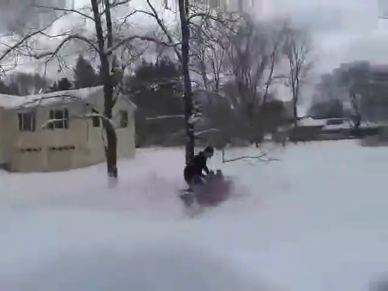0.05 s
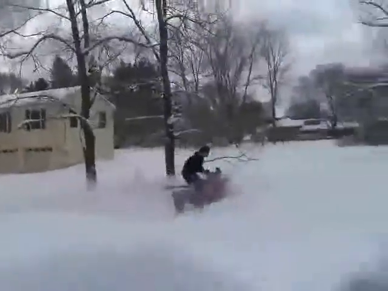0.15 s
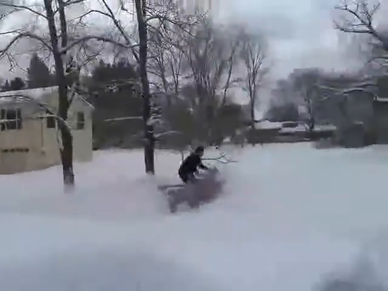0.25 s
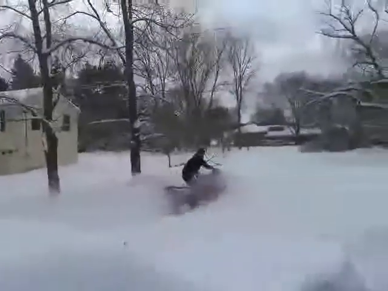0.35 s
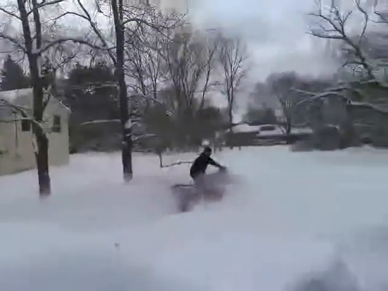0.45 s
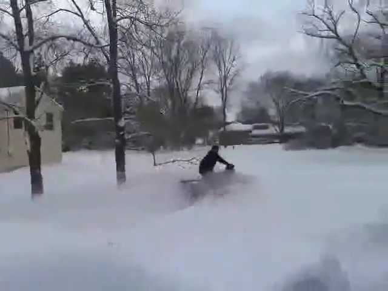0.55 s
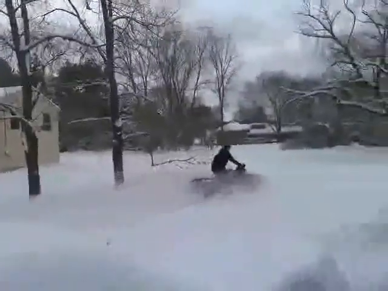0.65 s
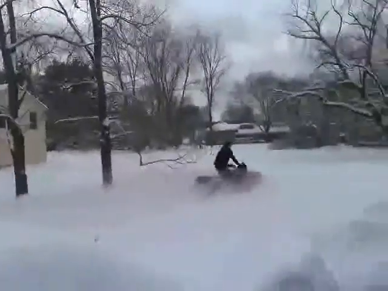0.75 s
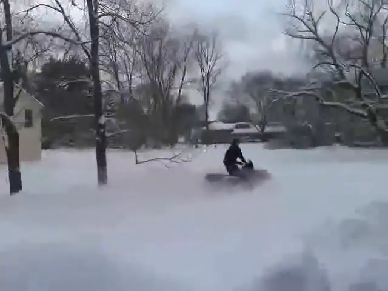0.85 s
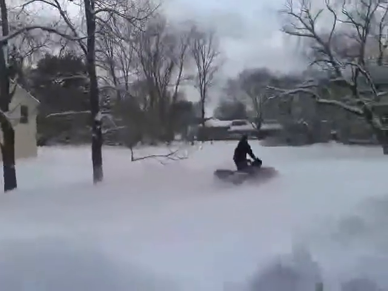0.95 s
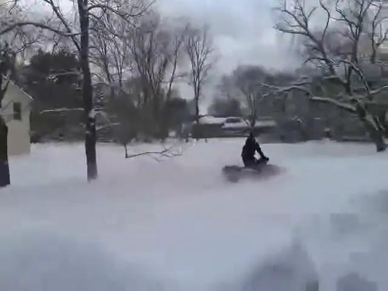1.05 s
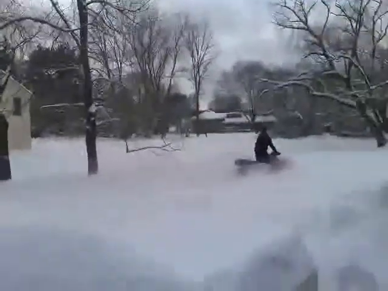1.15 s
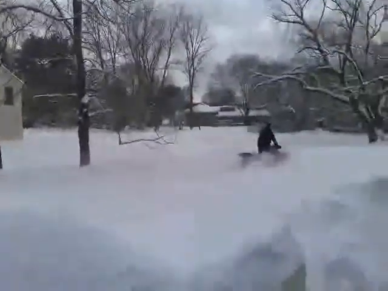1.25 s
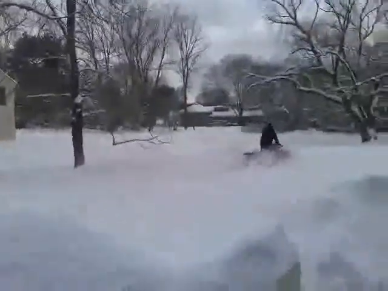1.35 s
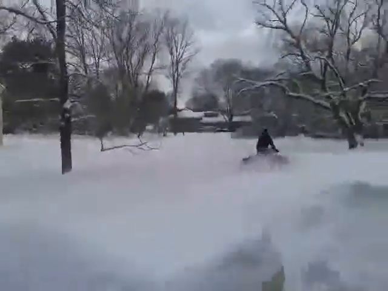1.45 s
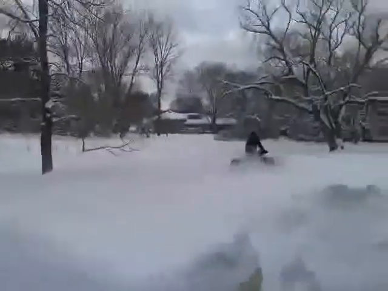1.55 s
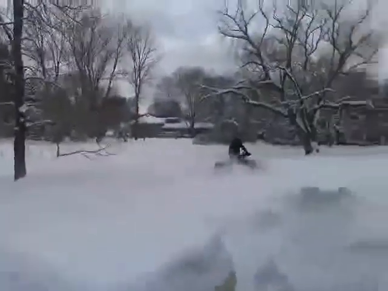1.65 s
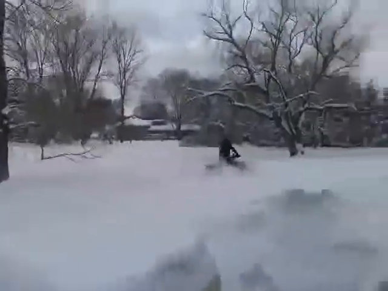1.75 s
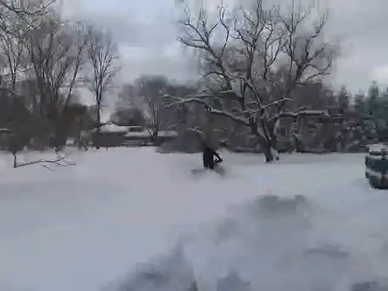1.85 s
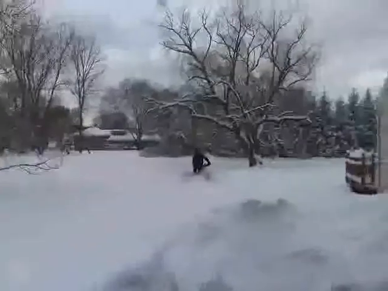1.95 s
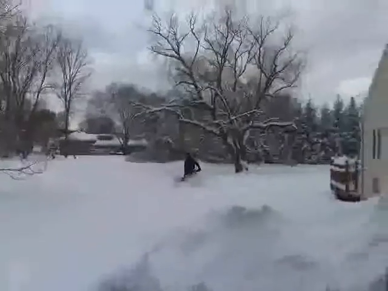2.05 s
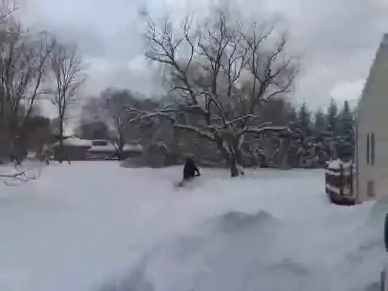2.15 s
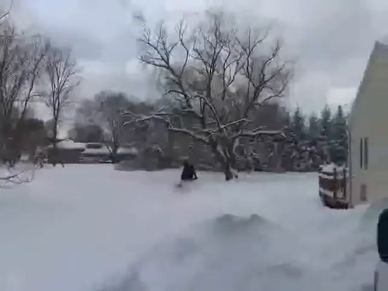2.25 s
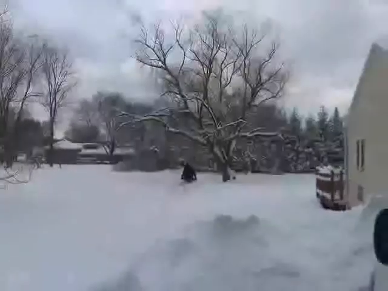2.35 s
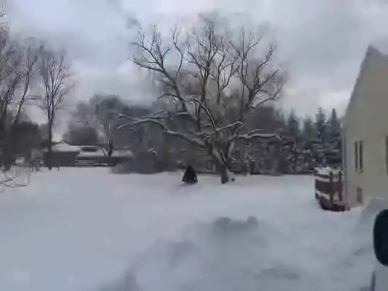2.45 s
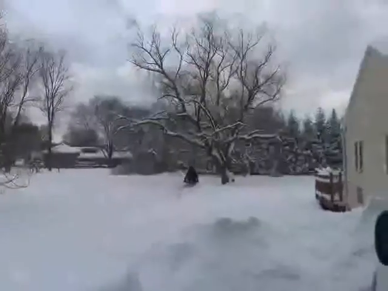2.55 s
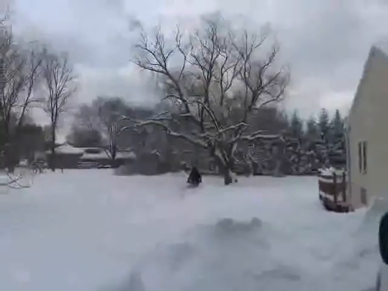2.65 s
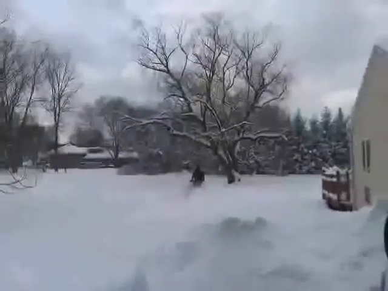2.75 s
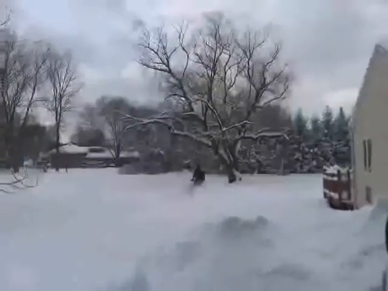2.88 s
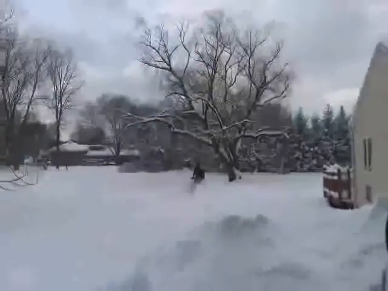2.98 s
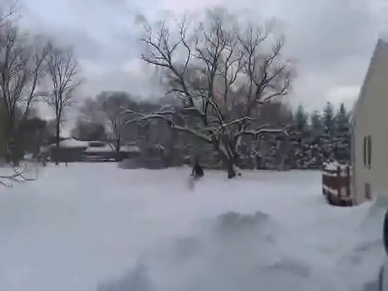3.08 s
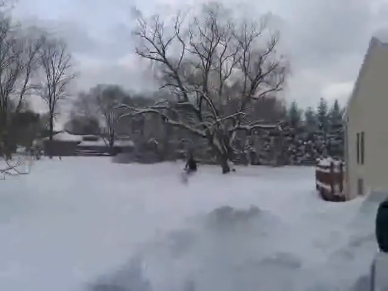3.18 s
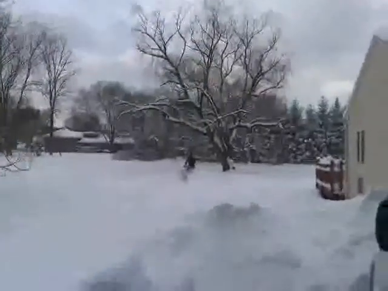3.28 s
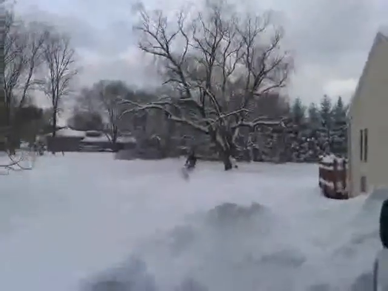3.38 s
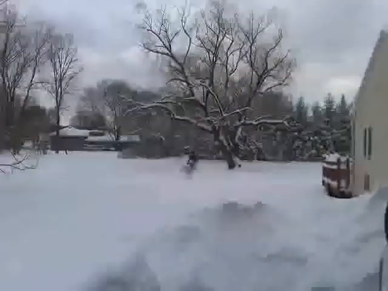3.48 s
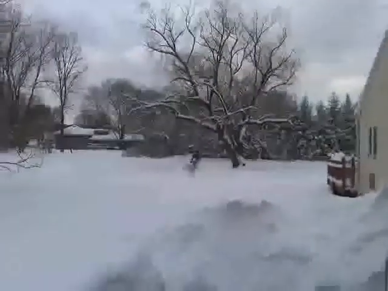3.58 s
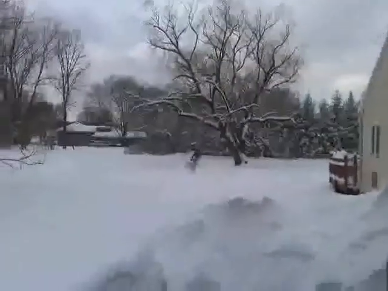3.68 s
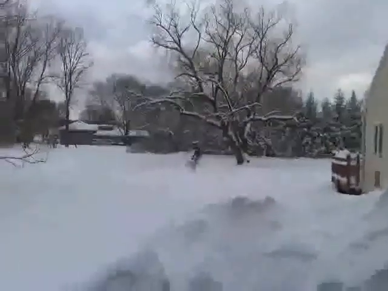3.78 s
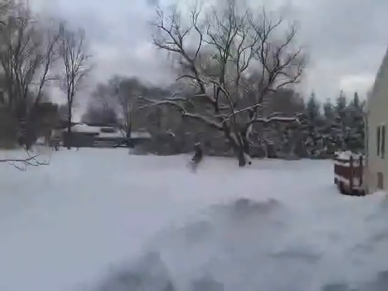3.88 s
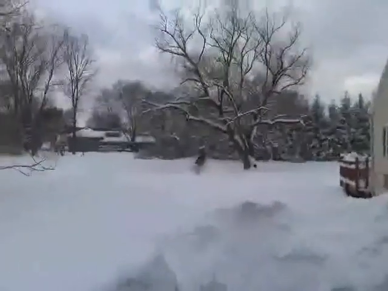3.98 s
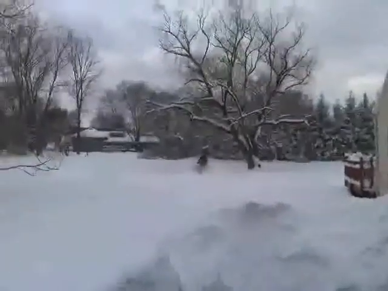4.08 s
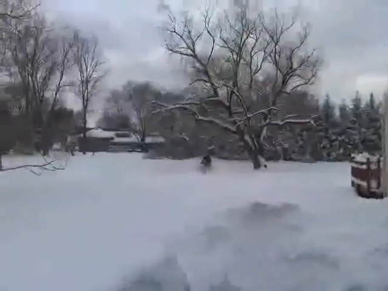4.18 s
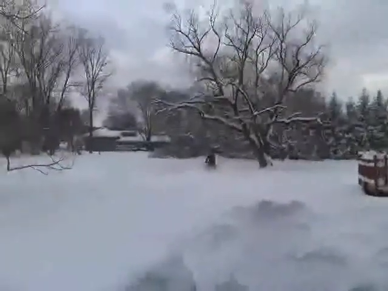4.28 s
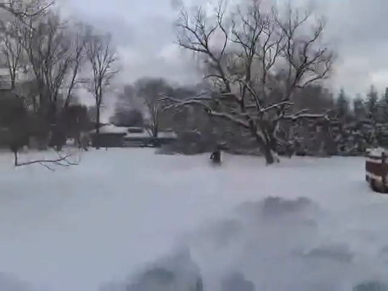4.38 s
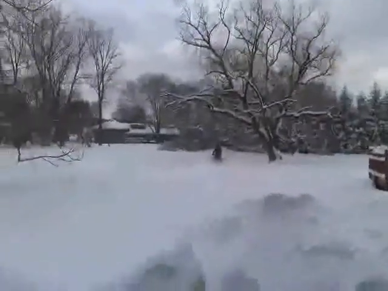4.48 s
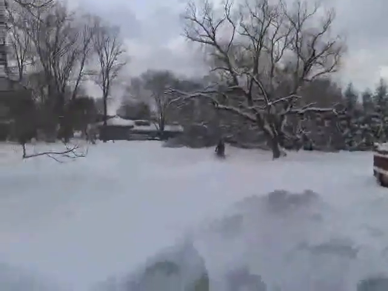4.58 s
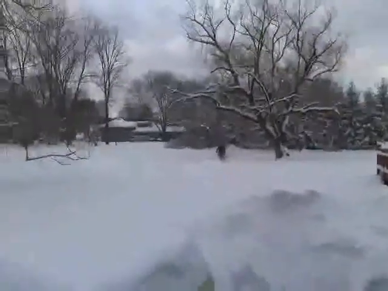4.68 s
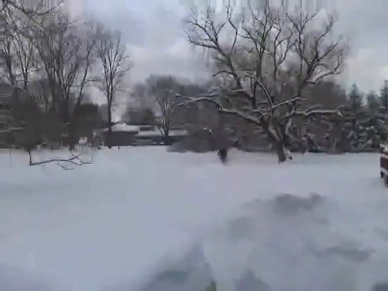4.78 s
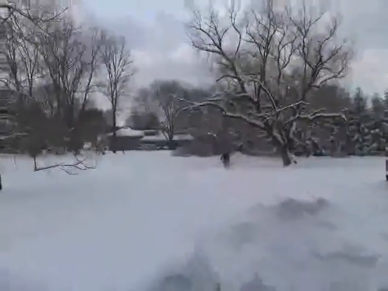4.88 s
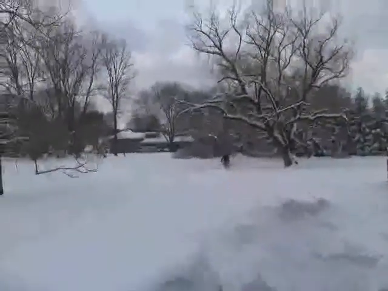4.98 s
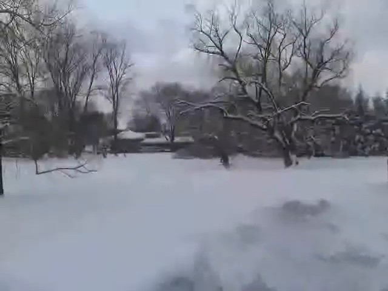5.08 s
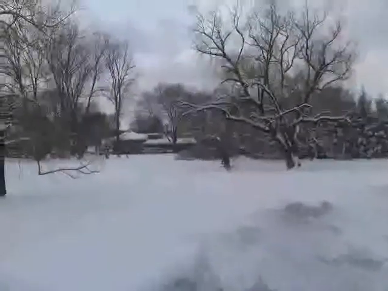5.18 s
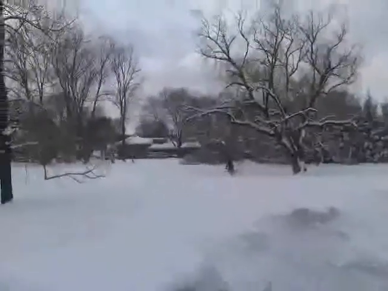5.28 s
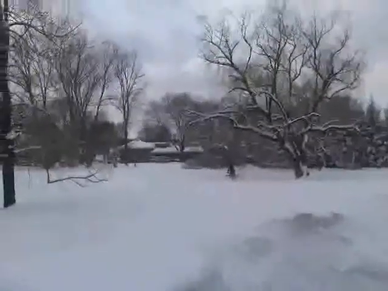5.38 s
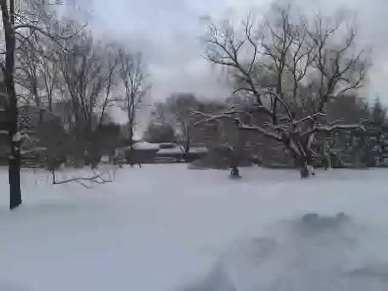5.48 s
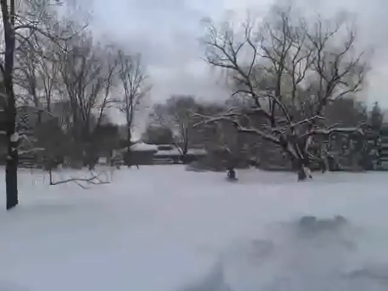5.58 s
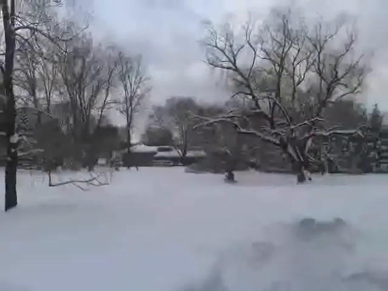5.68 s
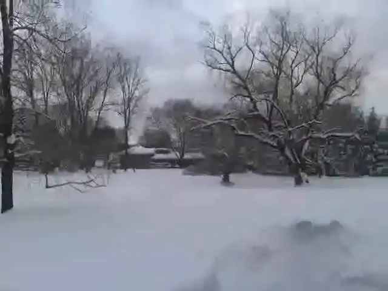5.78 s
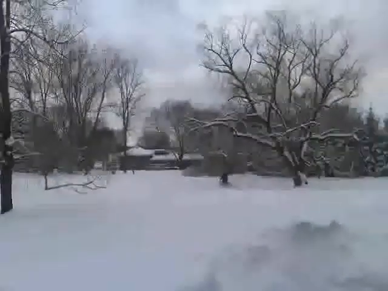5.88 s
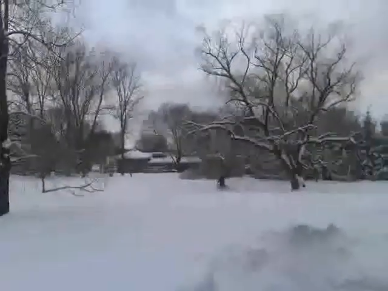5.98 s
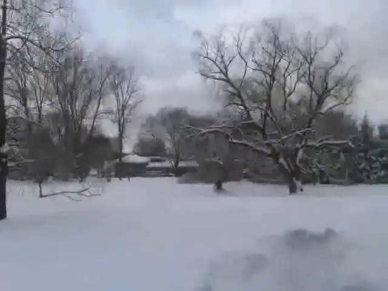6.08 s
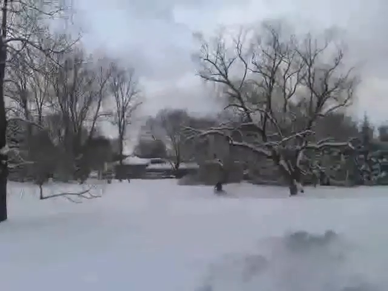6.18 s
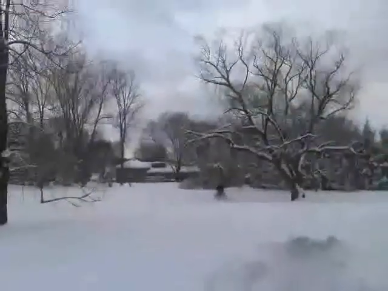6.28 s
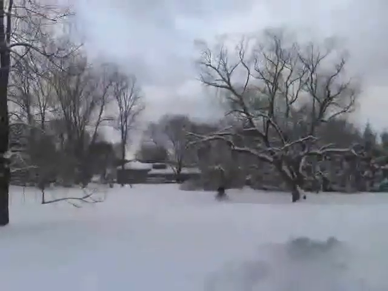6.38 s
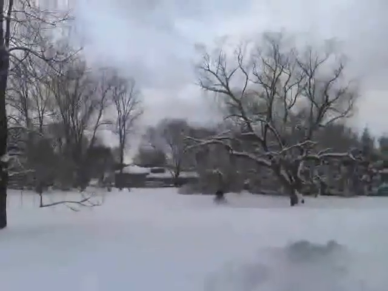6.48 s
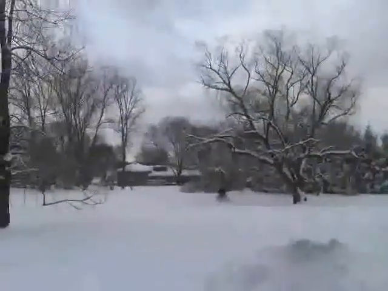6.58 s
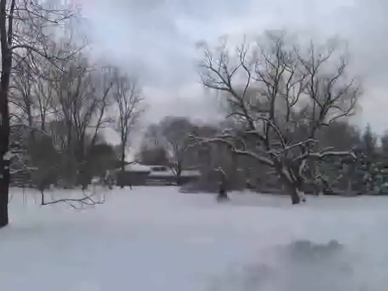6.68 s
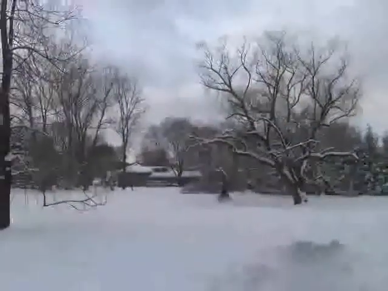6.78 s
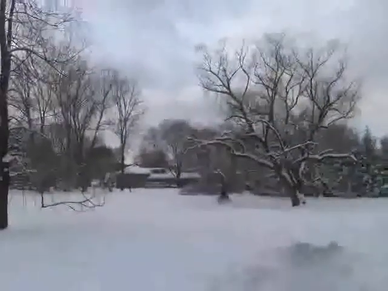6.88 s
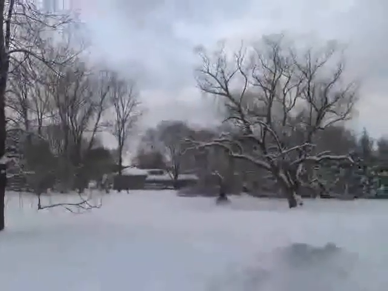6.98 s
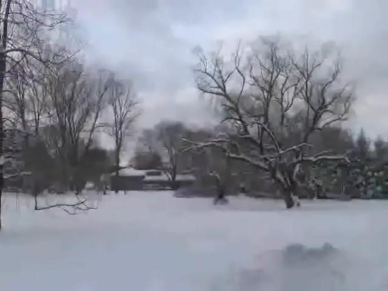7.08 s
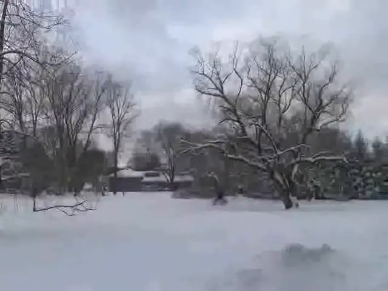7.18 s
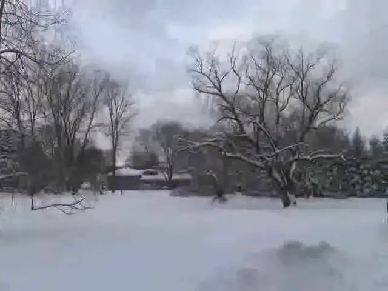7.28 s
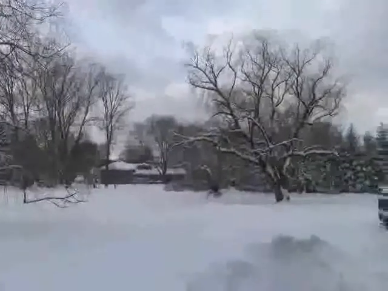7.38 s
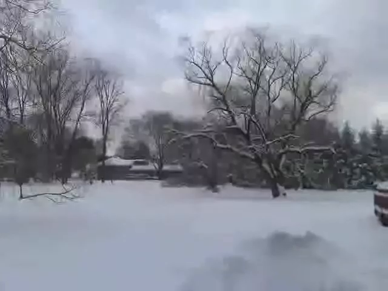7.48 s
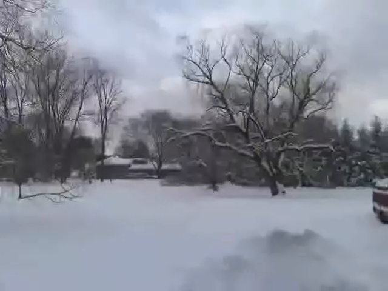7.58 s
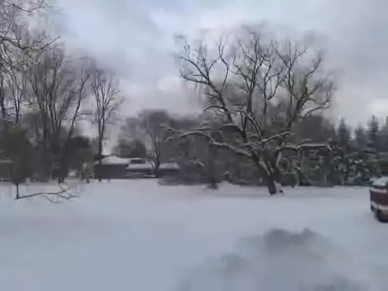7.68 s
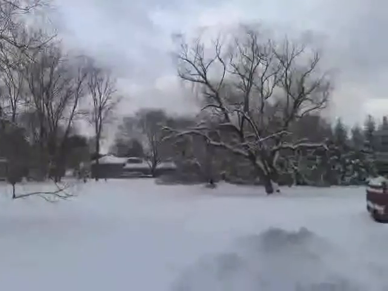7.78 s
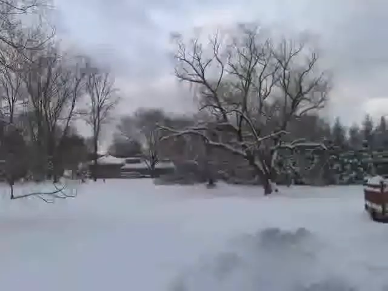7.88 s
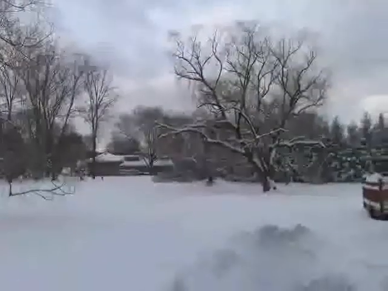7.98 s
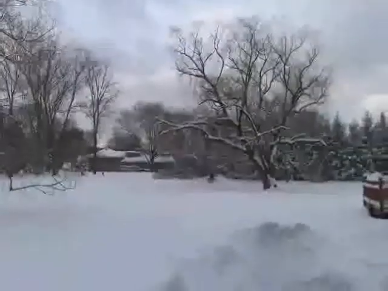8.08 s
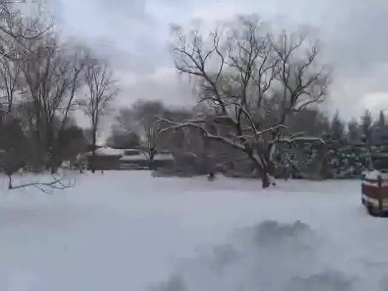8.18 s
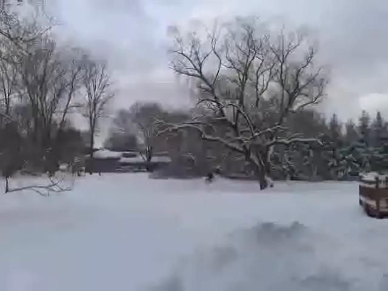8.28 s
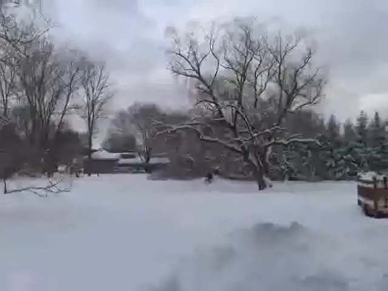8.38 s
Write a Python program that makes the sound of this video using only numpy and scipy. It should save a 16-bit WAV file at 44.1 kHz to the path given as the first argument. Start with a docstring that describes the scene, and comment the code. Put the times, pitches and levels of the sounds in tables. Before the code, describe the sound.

A quad bike engine throbs and rasps close by, turns tail-on with sharp exhaust cracks, then drives off and sinks into faint open-air hiss.

```python
"""A throbbing muffler boom comes first, over the rasp and hiss of a single-cylinder four-stroke quad bike.
Sharp exhaust cracks stand out once the tailpipe faces the listener, as the bike drives off across snow.
The notes are orders (multiples) of the firing rate; turbulent noise, surging at each exhaust stroke and
ringing in pipe and casing, makes chuff, rasp and crack; gear whine, squeaks and bumps join in.
Far away the rider eases off, and the engine sinks into the faint steady hiss of the open air."""
import sys
import numpy as np
from scipy import signal
from scipy.fft import rfft, irfft, next_fast_len
from scipy.io import wavfile
from scipy.ndimage import uniform_filter1d

SR = 44100
rng = np.random.default_rng(int(sys.argv[2]) if len(sys.argv) > 2 else 0)


def store_wav(level_fs):
    """Save 16-bit WAV to argv[1]."""
    pcm = np.round(np.clip(np.atleast_2d(level_fs), -1, 1) * 32767)
    wavfile.write(sys.argv[1], SR, pcm.T.astype(np.int16))


N = 372644
TIME = np.arange(N) / SR

# steady hiss of the open air: pitch_hz, density_db (relative, per Hz)
AIR_SPECTRUM = [(24, -77), (40, -47), (70, -20), (124, -12), (228, -5), (922, -3), (1210, 1), (1500, -2.5),
                (2170, -5.5), (2850, -3), (4320, -11), (9930, -14.5), (10700, -15), (11500, -65),
                (14000, -67)]
AIR_DB = -53
# soft low bumps: centre_s, level_db
BUMPS = [(.095, -58), (2.635, -63)]
BUMP_HZ, BUMP_HALF_S = 81.4, .022
# brief squeaks as the throttle shuts: centre_s, pitch_hz (at the centre), level_db
SQUEAKS = [(5.043, 1320, -48), (5.13, 1900, -45.5)]
SQUEAK_HALF_S, SQUEAK_SAG_HZ_PER_S = 0.011, 1500

# gear whine, sinking with the ground speed: time_s, pitch_hz
WHINE_PITCH = [(4.4, 1250), (5.05, 1285), (5.5, 1245), (5.9, 1228), (6.25, 1075), (6.6, 992), (6.8, 970),
               (7.15, 958), (7.42, 900), (7.57, 912), (7.68, 938), (7.82, 953), (8.0, 938), (8.45, 905)]
# level of the gear whine: time_s, level_db
WHINE_LEVEL = [(4.4, -70), (4.8, -55), (5.1, -56), (5.4, -68), (5.9, -63.5), (6.1, -70), (6.35, -62.5),
               (6.6, -63.5), (6.9, -60), (7.15, -66), (7.4, -75), (7.9, -65), (8.45, -71)]
# higher notes of the gears: multiple (of the whine's pitch), strongest_s, half_length_s, level_db
WHINE_OVERTONES = [(2, 7.74, .1, -53.5), (2, 7.45, .08, -63), (3, 7.9, .2, -63), (10 / 3, 7.78, .07, -61)]
WHINE_FADE_IN_S = 0.51

# firings that pop harder than their neighbours: start_s, level_db (loudest 2 ms), ring_hz
BANGS = [(1.5438, -35, 2520), (1.5692, -31.5, 3950), (1.5964, -33, 2480), (1.7252, -30, 3880),
         (2.0615, -30, 2200), (2.084, -30.5, 2530), (2.1105, -27, 2760), (2.1332, -29.5, 2220),
         (2.159, -28, 2690), (2.254, -32, 2170), (2.278, -32, 2100), (2.466, -25.5, 3310),
         (2.6276, -32.5, 2350), (2.8337, -37, 2240), (2.972, -33, 2130), (3.065, -26.5, 3550),
         (3.0893, -31, 2020), (3.1118, -34, 2500), (3.206, -30.5, 2800), (3.2523, -34, 1610),
         (3.3492, -39, 1510), (3.3742, -33, 2500), (3.3987, -30.5, 2050), (3.4223, -31.5, 2300),
         (3.4732, -39, 1490), (3.7113, -32.5, 1940), (3.7651, -35, 1030), (3.7912, -38, 2910),
         (3.8707, -33, 1920), (3.9962, -35, 1060), (4.0446, -34, 1550), (4.123, -33.5, 1810),
         (4.2245, -40, 1890), (4.3283, -34.5, 2830), (4.4058, -35.5, 3210), (4.456, -31.5, 1700),
         (4.482, -34, 1920), (4.5063, -35, 1700), (4.5308, -33.5, 1700), (4.776, -35, 1660),
         (4.8004, -35, 1700), (4.8723, -37, 1700), (4.922, -28, 2630), (4.9686, -34, 1700),
         (4.9942, -38, 3300), (5.0424, -35.5, 1360), (5.348, -41, 1660), (5.3748, -36, 1830),
         (5.4012, -36, 1460), (5.4272, -33.5, 2910), (5.806, -38.5, 3210), (6.5783, -41, 2500),
         (7.6358, -43.5, 2050), (7.665, -41, 1530), (7.696, -43, 1750), (7.7255, -41.5, 2280)]
BANG_RISE_S, BANG_DECAY_S = .00015, .002
BANG_LOW_HZ, BANG_HIGH_HZ, BANG_RING_DB, BANG_RING_WIDTH_HZ = 900, 4100, 8, 450

# echo off a surface beside the microphone: time_s, delay_ms
ECHO_DELAY = [(0, 2.35), (2.6, 1.99), (6, 2.13)]
# resonances of tailpipe and casing, each beamed at the listener for a while:
# pitch_hz, width_hz, gain_db, strongest_s, half_length_s
BODY_RESONANCES = [(920, 70, 5, .66, .015), (1330, 50, 6, .42, .04), (1600, 90, 5, .66, .015),
                   (1067, 46, 0, 3.3, 0.6), (1544, 130, -3, 8, 1.9), (2280, 74, -3.5, 2.6, 1.8),
                   (2450, 110, 6, 7, 0.74), (2800, 110, 0, 7, 3.4), (2815, 70, 4, 6.3, .4),
                   (3160, 59, 4, 5.6, .7), (3270, 110, 6, 6.4, .3), (1270, 60, 1, 5.8, .7),
                   (3180, 130, 3, 7.9, .25), (3580, 67, -11, 1.9, 0.43), (4850, 96, -5, 3.5, 0.9),
                   (5100, 290, 1, .5, 0.39), (5290, 72, 8, 6.4, 0.47), (5500, 150, -7, 5.9, 0.33),
                   (5850, 350, 7.5, 2.65, .3), (6470, 90, 1, 4.9, 1.8), (6740, 240, 6.5, 2.37, 0.34),
                   (7400, 260, 3, 3.85, 0.13), (8470, 110, -7, 3.4, 1.2), (8800, 170, 0, 0.42, 0.61),
                   (9550, 320, 3, 3.6, 0.29)]
# the resonances wander as the bike rocks over the snow: share of their pitch, moves per s
WANDER, WANDER_RATE = .005, 1.0

# colour of the machine's gas noise side on: pitch_hz, density_db (relative, per Hz)
SIDE_ON = [(150, -36), (250, 7), (291, -10), (445, -6.5), (624, -8), (691, -6.5), (1090, -2), (1510, -1.5),
           (2040, -4), (3170, 0), (4300, -12.5), (5270, -9), (9710, -10.5), (12900, -13.5), (14300, -17)]
# the same from behind: pitch_hz, density_db
BEHIND = [(150, -43), (250, -25), (422, -10), (458, -32), (521, -6), (954, -6), (1070, 4.5), (1320, -3.5),
          (1560, 4.5), (1780, -8.5), (1990, 0.5), (2760, 1.5), (3300, -3.5), (6780, -12), (12400, -12),
          (16100, -101), (22000, -120)]
# the same across the field: pitch_hz, density_db
ACROSS = [(150, -39), (250, -8), (304, -15), (481, -5.5), (677, -8), (1000, 1.5), (1200, -3.5), (1510, 3),
          (2310, 0), (2850, 6.5), (3890, -5.5), (4890, -4.5), (7000, -9.5), (9710, -5.5), (12400, -13.5),
          (16100, -107), (22000, -120)]
# the same far off: pitch_hz, density_db
FAR_OFF = [(150, -44), (250, -5), (266, 5), (313, -1), (416, -17), (466, -9), (814, -5.5), (939, -2.5),
           (1160, -5), (1250, 0.5), (2610, 4), (3160, 4), (4410, -9.5), (5340, -7.5), (11300, -9.5),
           (14700, -70), (22000, -120)]
# moment at which each of the four colours stands alone: time_s
COLOUR_TIMES = [1.0, 2.2, 4.2, 6.0]

# how far the firings stand out as the tailpipe turns to the listener; load adds to it: time_s, gain_db
PUNCH = [(0, -20), (1.0, -13), (1.6, -5.5), (2.3, -3), (3.2, -3.5), (3.8, -2), (5, -3), (5.7, -3.5),
         (6.9, -1.5), (7.4, -4), (8.45, -3)]
PUNCH_PER_LOAD = 0.074  # dB per dB of load
# every firing rings at a pitch of its own: level against the crack, middle pitch, spread
POP_DB, POP_HZ, POP_SPREAD_OCTAVES = 6.5, 2150, .42
# how hard the engine works as the rider opens and shuts the throttle: time_s, load_db
LOAD = [(0, -1), (.2, -2), (.57, -5), (.69, 0), (.93, 0), (1.07, 3.5), (1.28, -0.3), (1.72, 0),
        (1.97, -1.5), (2.12, 3), (2.5, 2.5), (2.73, -1), (3.08, 2.5), (3.55, -2), (3.98, 1.5), (4.28, -0.5),
        (4.5, 2), (4.93, 2.5), (5.24, -1.5), (5.41, 1.5), (6.3, -2), (7.25, -1.5), (7.72, 1.5), (7.92, 0.5),
        (8.45, 1)]
# the bike swings from side on to tail on between these times
TURN_START_S, TURN_END_S = 1, 1.5
# level laws: start_db, load_slope (dB per dB of load), turn_db (gained in the turn),
# fade_db_per_s (lost as the bike recedes)
# low chuff of gas
CHUFF_LAW = (-46.5, 1.03, -1.8, 1.95)
# rasp, same columns
RASP_LAW = (-36.5, 1.38, -0.12, 2.5)
# crack, same columns
CRACK_LAW = (-38.5, 1.61, 1.74, 2.5)
# hiss, same columns
HISS_LAW = (-32, 1.65, -0.22, 3.5)
# the low chuff of gas swells: strongest_s, half_length_s, gain_db
CHUFFS = [(.08, 0.14, 6.5), (.9, 0.19, 2), (2.8, 0.16, 2.5)]
# the hiss swells, as when the tyres throw up snow: strongest_s, half_length_s, gain_db
SPRAYS = [(1.08, 0.075, 1.5), (1.85, 0.29, 2), (3.15, .3, -0.5), (5.125, 0.024, 5.5), (5.68, 0.46, 2)]
# straight from behind, the bike hides its own casing: strongest_s, half_length_s, gain_db
HIDDEN = [(2.1, 0.41, -4)]

# engine speed: time_s, firing_rate_hz
FIRING_RATE = [(0.0, 44.88), (0.18, 44.64), (0.39, 36.97), (0.58, 33.86), (1.15, 42.81), (1.44, 36.66),
               (1.65, 38.94), (2.0, 38.48), (2.18, 42.53), (2.47, 42.06), (2.58, 44.11), (3.25, 42.35),
               (3.7, 36.43), (3.97, 40.18), (4.33, 38.29), (4.57, 40.95), (5.01, 41.31), (5.32, 37.63),
               (5.56, 39.91), (6.0, 39.4), (6.38, 33.22), (7.43, 31.45), (7.81, 33.87), (8.45, 31.99)]
START_TURN = .346  # cycles
# the lowest orders lie under the boom and die away sooner: time_s, level_db
THUD_LEVEL = [(.12, -54), (.4, -73), (.7, -64), (1.1, -63), (1.5, -66), (2.3, -66), (3.1, -71), (3.6, -80),
              (8.45, -95)]
# response of the muffler below its resonance: pitch_hz, gain_db
THUD_COLOUR = [(118, 2), (135, -5.5), (152, -5), (180, 2.5)]
# boom of the muffler: time_s, level_db
BOOM_LEVEL = [(0.12, -45), (.25, -51), (.55, -66), (.8, -59), (1.15, -54), (1.4, -61.5), (1.8, -65),
              (2.0, -62), (2.2, -56), (3.1, -55), (3.6, -59), (4.9, -61.5), (5.3, -65.5), (6.1, -66),
              (6.6, -71), (7, -78.5), (8.45, -74)]
# resonant response of the muffler: pitch_hz, gain_db
MUFFLER = [(175, -19), (195, -9), (212, 2.5), (224, 12), (240, 5), (258, -1.5), (275, -10), (310, -19.5)]
# reflections lift or cancel an order of the boom for a while: order, strongest_s, half_length_s, gain_db
BOOM_SHIFTS = [(6, .1, .1, 6), (5, 1.05, .3, -11), (6, 2.4, .3, -6)]
# level of the tailpipe's growl: time_s, level_db
GROWL_LEVEL = [(.17, -41), (.28, -46), (.57, -50.5), (.75, -44.5), (1.15, -45), (1.5, -49), (1.95, -54),
               (2.15, -47), (3.1, -48.3), (3.5, -59), (3.95, -56), (4.25, -58.5), (4.8, -54), (5.2, -61),
               (5.5, -56), (5.9, -57), (6.4, -63.5), (7, -70), (8.45, -69)]
# response of the tailpipe side on: pitch_hz, gain_db
PIPE_SIDE_ON = [(260, 0), (312, -10), (355, 1.5), (402, 1), (450, 5), (495, -5), (535, -6), (578, 4.5),
                (620, -9), (675, 3), (760, -5), (810, -7), (850, 4), (900, 0), (1000, -6)]
# the same turning away: pitch_hz, gain_db
PIPE_TURNING = [(255, 2), (285, -2), (305, -9), (340, -1), (376, 3), (410, -7), (450, 4), (472, 2),
                (492, -10), (520, -5), (545, 2), (572, 5), (605, -9), (640, -1), (675, -6), (705, 3),
                (790, -5), (1000, -4)]
# the same from behind: pitch_hz, gain_db
PIPE_BEHIND = [(270, 0), (297, -2), (312, -16), (345, 0), (385, -3.5), (425, 2), (465, -6.5), (510, 4.5),
               (555, 5.5), (610, -4), (640, -2), (760, -0.5), (810, 3.5), (900, 2), (1000, -3)]
# the same far off: pitch_hz, gain_db
PIPE_FAR = [(280, -8), (320, -3), (360, -3), (440, -8), (482, 5.5), (520, 0), (570, -7), (680, -9),
            (740, 4.5), (800, -7), (890, 4), (1000, -6)]
# side on until, turning between, from behind between, and far off after: time_s
PIPE_TIMES = [.2, .3, 1.22, 1.4, 3.2, 4.4]
PIPE_SCATTER_PER_ORDER = .012


def from_db(db):
    """Decibel law: 20 dB is a tenfold amplitude."""
    return 10 ** (np.asarray(db) / 20)


def rms_one(x):
    """Normalisation by power: scale to rms 1."""
    return x / np.sqrt(np.mean(x ** 2) + 1e-20)


def evened(x, size=5000):
    """Running normalisation: hold the local rms, averaged over about `size` samples, near 1."""
    power = uniform_filter1d(uniform_filter1d(x ** 2, size), size // 2)
    return x / np.sqrt(power + 1e-20)


def in_time(rows):
    """Linear interpolation: each column after the time becomes one value a sample."""
    s, *columns = np.transpose(rows)
    return [np.interp(TIME, s, c) for c in columns]


def at_hz(points, hz):
    """Spectral interpolation on a log-frequency axis."""
    f, db = np.transpose(points)
    return np.interp(np.log(np.maximum(hz, 1)), np.log(f), db)


def drift(rate):
    """Low-passed chance: white noise through a double pole at `rate` Hz, with spread 1."""
    step = 100  # samples between the slow values
    r = np.exp(-2 * np.pi * rate * step / SR)
    white = rng.standard_normal(N // step + 1002)
    slow = signal.lfilter([1], [1, -2 * r, r * r], white)[1000:]  # settled part
    return np.interp(np.arange(N) / step, np.arange(len(slow)), rms_one(slow))


def bell(s, half_length):
    """Gaussian envelope: a smooth rise and fall of height 1."""
    return np.exp(-.5 * ((TIME - s) / half_length) ** 2)


def swells(rows):
    """Gains in cascade add in decibels: swell or sink around given moments."""
    return from_db(sum(db * bell(s, half_length) for s, half_length, db in rows))


def circle(turns):
    """Uniform rotation projects to a cosine and a sine."""
    angle = (2 * np.pi * (turns - np.floor(turns))).astype(np.float32)
    return np.cos(angle), np.sin(angle)


def partial(turns, scatter, rate):
    """Multipath interference: scattering from ground and trees makes a line of rms 1 swell and fade."""
    cos, sin = circle(turns)
    return rms_one(cos * (1 + scatter * drift(rate)) + sin * scatter * drift(rate))


def band(x, low_hz, high_hz, order=4):
    """Band limiting with a Butterworth band-pass."""
    edges = [low_hz, min(high_hz, .45 * SR)]
    return signal.sosfilt(signal.butter(order, edges, "band", fs=SR, output="sos"), x)


def coloured_noise(spectrum):
    """Spectral shaping: white noise weighted in frequency, rms 1."""
    size = next_fast_len(N)
    gain = from_db(at_hz(spectrum, np.fft.rfftfreq(size, 1 / SR)))
    return rms_one(irfft(rfft(rng.standard_normal(size)) * gain, size)[:N])


def resonance(x, hz, width_hz):
    """Damped oscillator: a two-pole resonance with gain 1 on top."""
    r = np.exp(-np.pi * width_hz / SR)
    feedback = [1, -2 * r * np.cos(2 * np.pi * hz / SR), r * r]
    return signal.lfilter((1 - r * r) / 2 * np.array([1, 0, -1]), feedback, x)


def wandering_resonance(x, hz, width_hz):
    """Heterodyne resonance with gain 1 on top, whose centre moves slowly by chance."""
    r = np.exp(-np.pi * width_hz / SR)
    carriers = circle(np.cumsum(hz * (1 + WANDER * drift(WANDER_RATE))) / SR)
    # shift down to zero frequency, smooth, shift back up
    return 2 * sum(c * signal.lfilter([1 - r], [1, -r], x * c) for c in carriers)


def puff(age, rise_s, decay_s):
    """Pressure release: a gas burst rises fast and decays exponentially, height 1."""
    age = np.maximum(age, 0)
    shape = (1 - np.exp(-age / rise_s)) * np.exp(-age / decay_s)
    return shape / shape.max()


def open_air():
    """Stationary broadband noise: the steady hiss of the open air."""
    return from_db(AIR_DB) * coloured_noise(AIR_SPECTRUM)


def bumps():
    """Low tone bursts: soft bumps, perhaps from the hand that holds the microphone."""
    envelope = sum(from_db(db) * bell(s, BUMP_HALF_S) for s, db in BUMPS)
    return envelope * partial(BUMP_HZ * TIME, scatter=.3, rate=20)


def squeak():
    """Falling chirps: thin, wavering notes that sag in pitch, perhaps from the drive belt."""
    out = np.zeros(N)
    for s, hz, db in SQUEAKS:
        # phase is the integral of a linearly falling pitch
        turns = hz * TIME - .5 * SQUEAK_SAG_HZ_PER_S * (TIME - s) ** 2
        out += from_db(db) * bell(s, SQUEAK_HALF_S) * partial(turns, scatter=.5, rate=70)
    return out


def gears():
    """Tooth meshing: the drive gears whine and sink in pitch as the bike slows; overtones sing out late."""
    mesh = np.cumsum(in_time(WHINE_PITCH)[0]) / SR
    fade_in = np.clip((TIME - WHINE_PITCH[0][0]) / WHINE_FADE_IN_S, 0, 1)
    out = fade_in * from_db(in_time(WHINE_LEVEL)[0]) * partial(mesh, scatter=.5, rate=10)
    for k, s, half_length, db in WHINE_OVERTONES:
        out += from_db(db) * bell(s, half_length) * partial(k * mesh, scatter=.7, rate=24)
    return out


def bangs():
    """Impulsive excitation: some firings pop, a steep burst of gas with a ring of its own."""
    out, age = np.zeros(N + SR), TIME[:SR // 40]
    envelope = puff(age, BANG_RISE_S, BANG_DECAY_S)
    noises = rng.standard_normal((len(BANGS), len(age)))
    for (s, db, hz), noise in zip(BANGS, noises):
        burst = evened(band(noise, BANG_LOW_HZ, BANG_HIGH_HZ, order=3), size=40) * envelope
        pop = burst + from_db(BANG_RING_DB) * resonance(burst, hz, BANG_RING_WIDTH_HZ)
        loudest = np.sqrt(uniform_filter1d(pop ** 2, size=88, mode="constant").max())
        first = round(s * SR)
        out[first:first + len(age)] += from_db(db) * pop / loudest
    return out[:N]


def radiated(x, low_hz, high_hz, order=4, echo_gain=0.23):
    """Resonance and comb filtering: the body rings along, and a close echo ripples the spectrum."""
    out = x
    for hz, width, db, s, half_length in BODY_RESONANCES:
        if low_hz < hz < high_hz:
            out = out + from_db(db) * bell(s, half_length) * wandering_resonance(x, hz, width)
    delay_ms, = in_time(ECHO_DELAY)
    echo = np.interp(TIME - delay_ms / 1000, TIME, out)
    return band(out + echo_gain * echo, low_hz, high_hz, order)


def gas_noise(spectrum, age, repeat):
    """Cyclic turbulence: a share of the noise power comes back alike on every engine cycle."""
    noise = coloured_noise(spectrum)
    share = np.clip(repeat, 0, 1)
    alike = rms_one(noise[np.round(age * SR).astype(int)])
    return np.sqrt(1 - share) * noise + np.sqrt(share) * alike


def flutter(fast_db, slow_db):
    """Turbulent modulation: the gain of a flow shivers and swells by chance."""
    return from_db(fast_db * drift(180) + slow_db * drift(4.3))


def turned():
    """Source orientation: heading 0 is side on, 1 is tail on."""
    return np.clip((TIME - TURN_START_S) / (TURN_END_S - TURN_START_S), 0, 1)


def level(law):
    """Source level law: load, heading and a steady fade with distance add in decibels."""
    start_db, per_load, turn_db, fade_db_per_s = law
    load_db, = in_time(LOAD)
    return from_db(start_db + per_load * load_db + turn_db * turned() - fade_db_per_s * TIME)


def machine(turns, speed):
    """Pulsed turbulence: gas noise surges at each exhaust stroke and again about 7 ms later."""
    punch = from_db(in_time(PUNCH)[0] + PUNCH_PER_LOAD * in_time(LOAD)[0])
    # the exhaust valve opens just before the peak of the stroke
    opening = turns + .045
    cycle, age = opening.astype(int), opening % 1 / speed
    # three random values per firing: first surge, second surge, ring pitch
    chance = rng.standard_normal((cycle.max() + 1, 3))[cycle]
    first = punch * from_db(1.1 * chance[:, 0])
    second = punch * from_db(1.9 * chance[:, 1]) * puff(age - .0072, .0008, .0042)
    sharp = first * puff(age, .00025, .0016)
    broad = first * puff(age, .0003, .0035)
    ring_hz = POP_HZ * 2 ** (POP_SPREAD_OCTAVES * chance[:, 2])
    pops = from_db(POP_DB) * sharp * partial(ring_hz * age, scatter=1, rate=200)

    # the colour changes as the machine turns away and recedes; square roots keep the power
    weights = [np.sqrt(np.interp(TIME, COLOUR_TIMES, row)) for row in np.eye(len(COLOUR_TIMES))]
    colours = [SIDE_ON, BEHIND, ACROSS, FAR_OFF]
    gas = sum(w * gas_noise(c, age, repeat=0.26) for w, c in zip(weights, colours))

    # turbulence makes rasp, crack and hiss flutter each in its own way
    chuff = evened(band(gas * (1 + 0.11 * broad + .5 * second), 340, 808))
    rasp_gas = gas * (1 + 1.8 * sharp + 0.5 * broad + .7 * second)
    rasp = flutter(0.62, 1.0) * evened(radiated(rasp_gas, 856, 1884))
    crack_gas = gas * (1 + 3.4 * sharp + .6 * broad + 1.8 * second)
    crack = flutter(1.0, 0.65) * evened(radiated(crack_gas, 2050, 4125))
    hiss_gas = gas * (1 + .6 * sharp + 1.0 * broad + .35 * second)
    hiss = flutter(1.4, 1.0) * evened(radiated(hiss_gas, 4290, 13500))
    rumble = coloured_noise([(30, -20), (70, -22.0), (110, -13.0), (250, -7.0), (400, -13.5), (1000, -70)])

    low = swells(CHUFFS) * level(CHUFF_LAW) * (from_db(-2.5) * chuff + from_db(-13.5) * rumble)
    middle = swells(HIDDEN) * level(RASP_LAW) * rasp
    high = level(CRACK_LAW) * (crack + pops)
    top = swells(SPRAYS) * level(HISS_LAW) * hiss
    return low + middle + high + top


def boom_shift(order):
    """Interference: reflections lift or cancel one order of the boom."""
    return swells([row[1:] for row in BOOM_SHIFTS if row[0] == order])


def tailpipe_gain(hz, size=100):
    """Pipe resonance: the tailpipe's response changes as the bike turns away and recedes."""
    # weight of each colour at the six PIPE_TIMES
    stages = ([1, 0, 0, 0, 0, 0], [0, 1, 1, 0, 0, 0], [0, 0, 0, 1, 1, 0], [0, 0, 0, 0, 0, 1])
    colours = [PIPE_SIDE_ON, PIPE_TURNING, PIPE_BEHIND, PIPE_FAR]
    s = TIME[::size]
    db = sum(np.interp(s, PIPE_TIMES, stage) * at_hz(colour, hz[::size])
             for stage, colour in zip(stages, colours))
    return np.interp(TIME, s, from_db(db))


def exhaust_notes(turns, speed):
    """Harmonic series of the firing rate: low thud, resonant muffler boom and rougher tailpipe growl."""
    thud, boom, pipe = np.zeros(N), np.zeros(N), np.zeros(N)
    for k in range(3, 5):
        thud += from_db(at_hz(THUD_COLOUR, k * speed)) * partial(k * turns, scatter=.17, rate=5)
    for k in range(5, 7):
        gain = boom_shift(k) * from_db(at_hz(MUFFLER, k * speed))
        boom += gain * partial(k * turns, scatter=.15, rate=6)
    for k in range(7, 25):
        # reflections in the pipe smear each pulse over the whole cycle: random phases
        line = partial(k * turns + rng.random(), scatter=PIPE_SCATTER_PER_ORDER * k, rate=3)
        pipe += tailpipe_gain(k * speed) * line
    thud_gain, boom_gain, growl_gain = [from_db(in_time(rows)[0])
                                        for rows in (THUD_LEVEL, BOOM_LEVEL, GROWL_LEVEL)]
    return thud_gain * thud + boom_gain * evened(boom) + growl_gain * evened(pipe)


def scene():
    """Superposition: the quad bike over the steady background, the same in both channels."""
    speed, = in_time(FIRING_RATE)
    turns = START_TURN + np.cumsum(speed) / SR
    background = open_air() + bumps()
    quad = squeak() + gears() + bangs() + machine(turns, speed) + exhaust_notes(turns, speed)
    mono = background + quad
    return np.array([mono, mono])


def record(dry):
    """Filtering: a high-pass thins the bass, and a steep low-pass ends the treble near 14 kHz."""
    thin = signal.sosfilt(signal.butter(3, 80, "high", fs=SR, output="sos"), dry)
    return signal.sosfilt(signal.ellip(10, .1, 80, 14200, fs=SR, output="sos"), thin)


dry = scene()
out = record(dry)
store_wav(out)
```